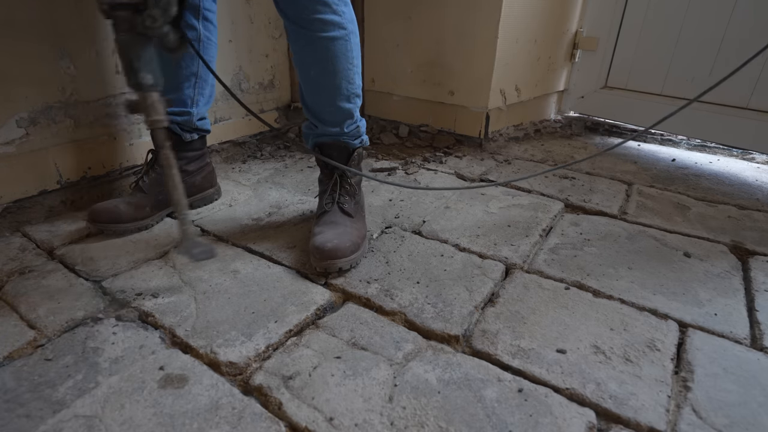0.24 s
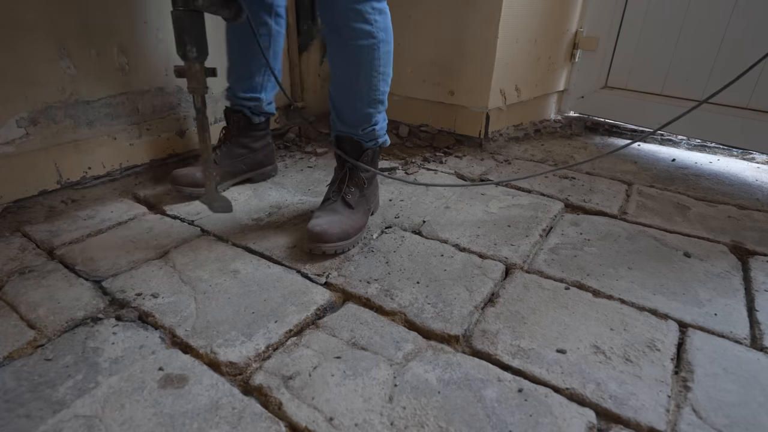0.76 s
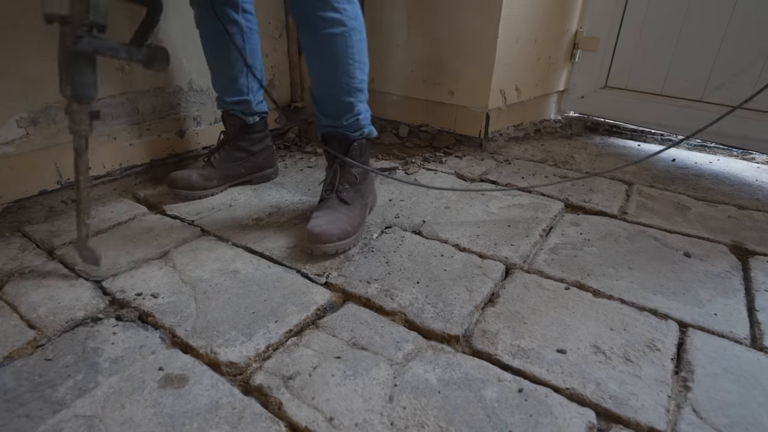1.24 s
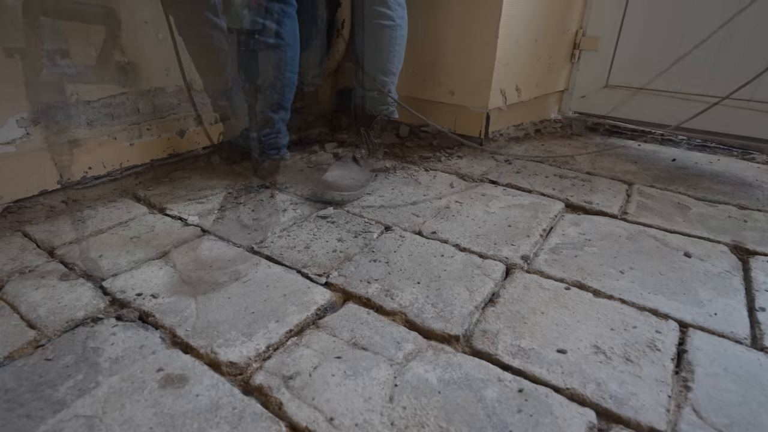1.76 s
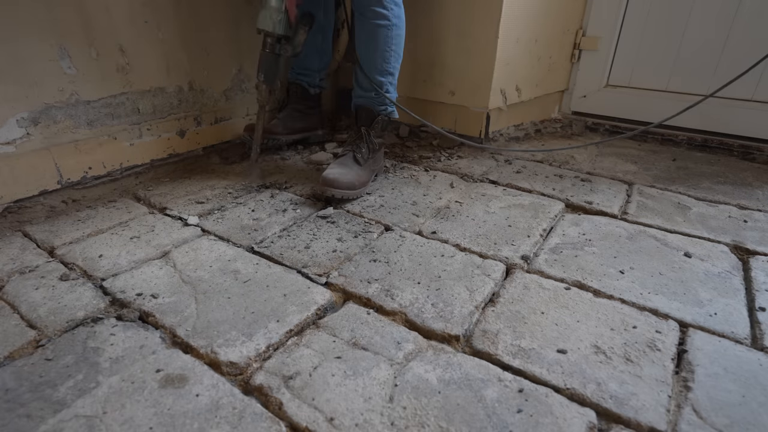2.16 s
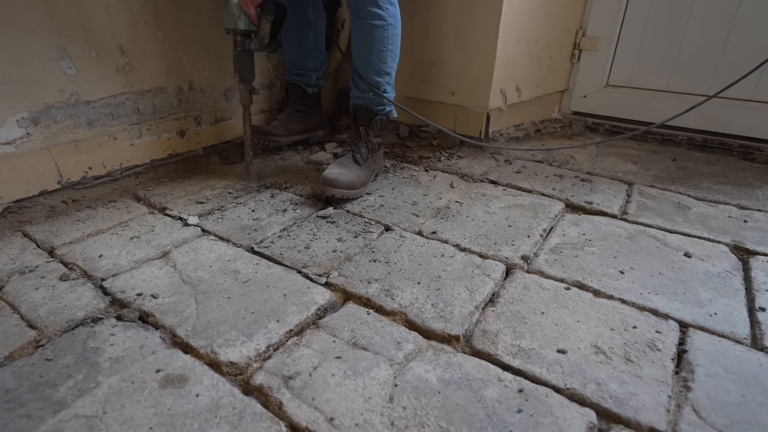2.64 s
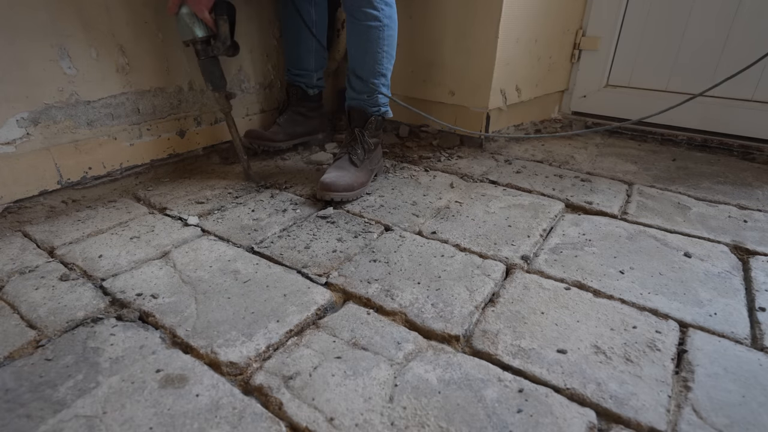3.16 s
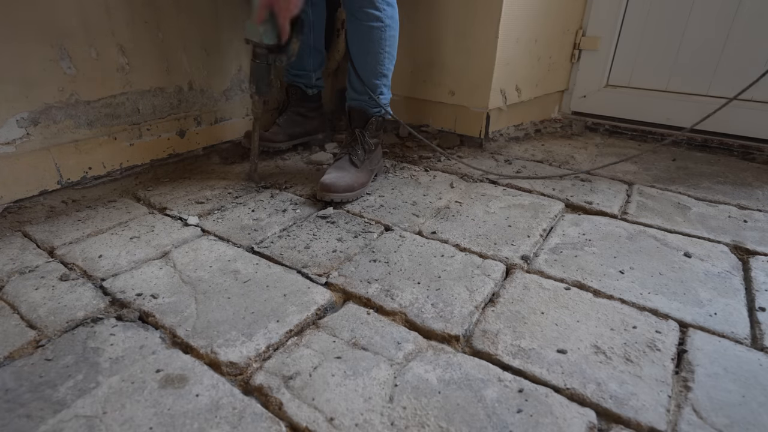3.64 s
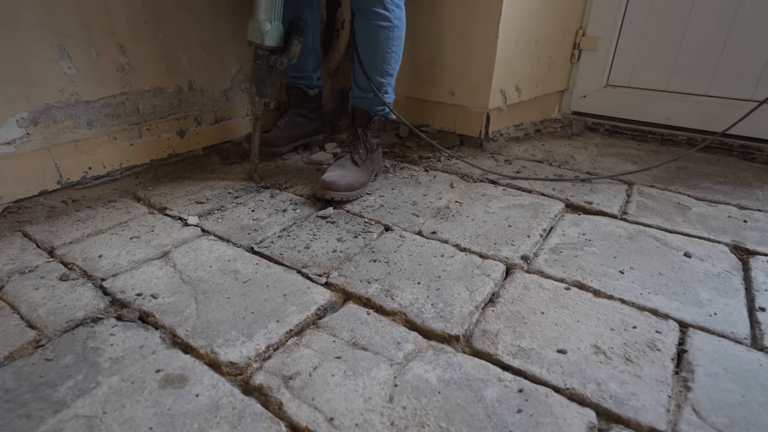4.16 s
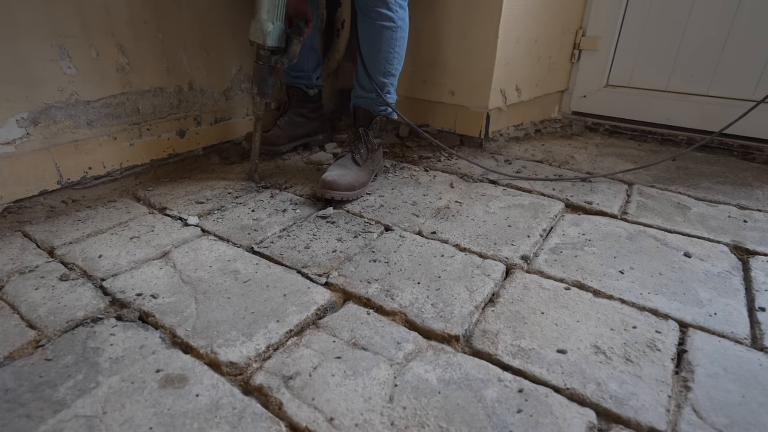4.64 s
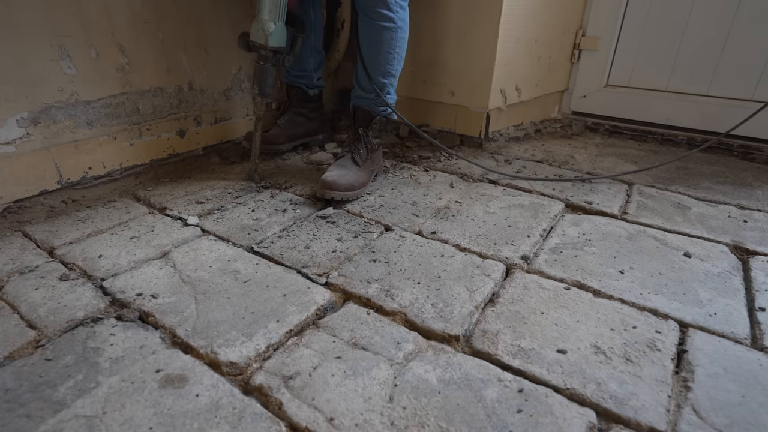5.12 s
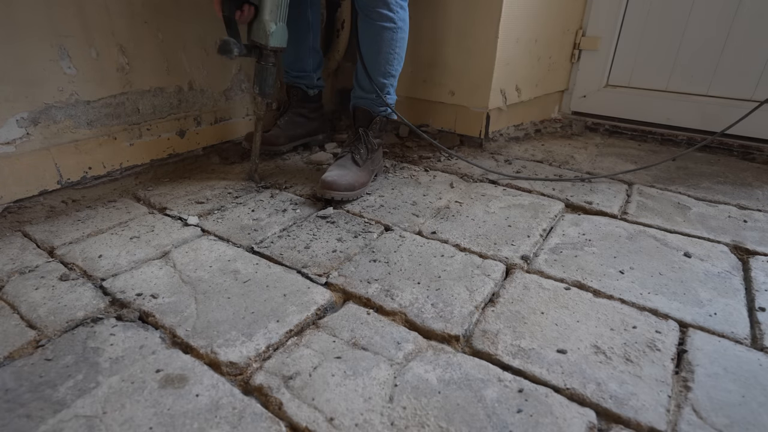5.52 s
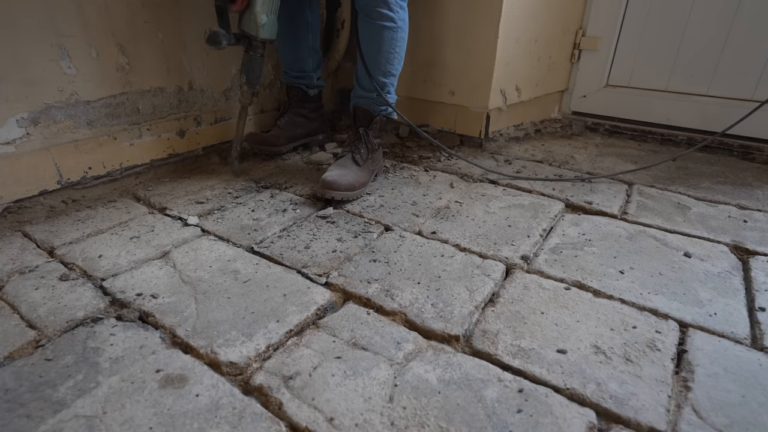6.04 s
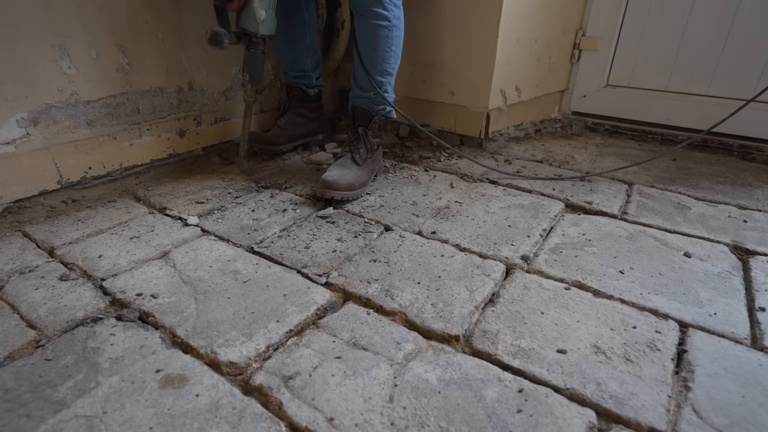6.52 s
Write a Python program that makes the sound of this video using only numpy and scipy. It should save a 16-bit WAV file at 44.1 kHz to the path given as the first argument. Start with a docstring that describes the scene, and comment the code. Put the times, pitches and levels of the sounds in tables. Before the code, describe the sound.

Close, hard chisel blows rattle on stone with bright steel ringing, between motor whoosh, dull knocks and gritty scrapes in an echoing hallway.

```python
"""In a bare hallway, an electric demolition hammer heard close by chisels stone paving and mortar.
Each blow cracks on the stone (noise bursts) and rings the steel bit (decaying sines). The blows
speed up, hold and slow down, and a second spell spins up at the end. In the pauses the bit scrapes,
squeaks and knocks among loose slabs. Behind it motor air rushes, the floor booms and walls echo.
Table levels are relative: each function sets them with its own trims."""
import sys
import numpy as np
from scipy import signal
from scipy.fft import rfft, irfft, next_fast_len
from scipy.io import wavfile
from scipy.ndimage import uniform_filter1d

SR = 44100
rng = np.random.default_rng(int(sys.argv[2]) if len(sys.argv) > 2 else 0)


def int16_out(signal):
    """Quantize to a 16-bit WAV file."""
    q = np.round(np.clip(np.atleast_2d(signal).T, -1, 1) * 32767)
    wavfile.write(sys.argv[1], SR, q.astype(np.int16))


N = 299439
CUTOFF_HZ = 15750   # nothing is heard far above this


# Motor speed: let go, it coasts down against air drag and friction until the piston stalls.
FULL_BLOWS_PER_S, STALL_BLOWS_PER_S = 23.1605, 2.5
COAST_S, FRICTION_PER_S2 = .692, .814
# Spells of hammering. Each row: first blow in seconds, blows per second at that moment,
# spin-up time in seconds, moment the trigger is let go in seconds.
HAMMER_SPELLS = [(2.0024, 12.875, .17976, 3.4133), (6.5425, 6.66, .129, 7.0)]


def blow_times():
    """One blow per turn of the crank, which spins up under the trigger and then coasts down."""
    times, t = [], np.arange(3 * SR) / SR
    friction = FRICTION_PER_S2 * COAST_S
    for first, start_rate, spin_up_s, let_go in HAMMER_SPELLS:
        driven = FULL_BLOWS_PER_S + (start_rate - FULL_BLOWS_PER_S) * np.exp(-t / spin_up_s)
        coasting = np.exp(-np.maximum(first + t - let_go, 0) / COAST_S)
        rate = (driven + friction) * coasting - friction
        turns = np.cumsum(rate[rate > STALL_BLOWS_PER_S]) / SR
        times += list(first + np.searchsorted(turns, np.arange(turns[-1])) / SR)
    return np.array([s for s in times if s < N / SR])


CRACK_SCATTER_DB = 2.5   # from blow to blow
# How the tip bears on the stone while hammering. Each row: time in seconds, crack in dB, ring in dB,
# ring tilt in dB per main mode, side modes in dB, floor boom in dB.
TIP_CONTACT = [(2.0, -28, -30.5, 8, -50, -46), (2.07, -31, -29.5, 8, -32.5, -48),
               (2.19, -24.5, -29, -3, -28.5, -44.5), (2.33, -30, -32.5, 1, -34.5, -46.5),
               (2.48, -29.5, -32.5, 2, -49, -48), (2.62, -30, -31, 1, -38, -51),
               (2.77, -26.5, -30, -2.5, -64, -43), (2.92, -28.5, -28.5, -3.5, -41, -53),
               (3.03, -28, -28.5, 3, -41, -51), (3.2, -29.5, -29, 5, -50, -48),
               (3.33, -27, -29.5, 2.5, -44, -46), (3.38, -33.5, -31, 4.5, -42, -54),
               (3.47, -31, -27, 1.5, -67, -46), (3.565, -29, -30, 3, -48, -44),
               (3.63, -27, -32, -5, -30.5, -40), (3.755, -27, -29, 5, -38.5, -44),
               (3.83, -22.5, -26.5, 4, -34, -37.5), (3.92, -30, -40, 11, -31, -36.5),
               (4.01, -18.5, -31.5, 5, -40, -37.5), (4.14, -22, -35.5, 2, -54, -40),
               (4.45, -17, -42, 1, -52, -45), (4.71, -18.5, -43, -8, -50, -44),
               (6.54, -23.5, -32, -1, -33.5, -39), (6.63, -31, -25, 15, -35, -48),
               (6.69, -25, -32.5, 5, -30.5, -45), (6.745, -24, -33.5, 7, -36, -52)]


def hammer_blows():
    """Each blow takes its strength and colour from the contact then: rows with the contact's columns."""
    times, (s, *columns) = blow_times(), np.transpose(TIP_CONTACT)
    crack, *others = [np.interp(times, s, c) for c in columns]
    scattered = crack + CRACK_SCATTER_DB * rng.standard_normal(len(times))
    return np.column_stack([times, scattered, *others])


RING_SCATTER_DB, BLOW_RING_DB = 5, -2   # from blow to blow; trim of the ring under the piston
# Free ringing when the side modes are as strong as the crack; the weaker they are, the shorter.
BLOW_FREE_S, LOOSENING = 0.025, 0.54


def share_ring(strikes):
    """Deal each blow's ring among the main modes: (s, crack dB, dB of each mode, side modes dB, free s)."""
    rows, driven_db = [], np.array(BIT_MAIN_MODES)[:, 1]
    for s, crack_db, ring_db, tilt_db, sides_db in strikes:
        scatter_db = RING_SCATTER_DB * rng.standard_normal(len(BIT_MAIN_MODES))
        shares = rms_one(from_db(driven_db + tilt_db * np.array([-1, 0, 1, 1]) + scatter_db))
        mains_db = ring_db + BLOW_RING_DB + 20 * np.log10(shares)
        free_s = BLOW_FREE_S * from_db(LOOSENING * (sides_db - crack_db))
        rows.append((s, crack_db, *mains_db, sides_db, free_s))
    return rows


# Each strike rings another spot of the stone: centre and scatter of its pitch, width, share.
SLAB_HZ, SLAB_OCTAVES, SLAB_WIDTH_HZ, SLAB_DB = 1900, .8, 240, -12.5
# Colour of the cracking stone. Each row: frequency in Hz, level in dB per Hz.
STONE_COLOUR = [(30, -25), (200, -1.5), (500, 2), (1300, -1), (2800, 1.5), (4000, 6.5), (5000, 3),
                (6200, 4.5), (8000, 5.5), (11400, 0.5), (15600, -4.5)]
# Colour of the piston clashing on the steel shank. Each row: frequency in Hz, level in dB per Hz.
CLASH_COLOUR = [(2000, -23.5), (5200, -8.5), (6150, 1), (6800, -0.5), (7400, 8), (8000, -1), (9500, 0),
                (11400, -7), (12350, 9), (13000, -3), (14400, -7), (15600, -3.5)]


def cracks(strikes, crack_db=8.0, crack_t60=0.056, snap_db=12.0, snap_t60=0.0021,
           strike_db=4.0, strike_t60=0.0059, clash_db=13.5, clash_t60=0.04,
           firm_db=-21.0, shortening=0.26):
    """Steel is struck, the tip snaps on the stone, the slab answers; very hard blows crack shorter."""
    out, size = np.zeros(N), SR // 8
    for s, level_db, *rings, _ in strikes:
        t60 = crack_t60 * from_db(-shortening * max(level_db - firm_db, 0))
        snap = from_db(snap_db) * burst(STONE_COLOUR, snap_t60, size)
        stone = burst(STONE_COLOUR, t60, size) + snap
        slab_hz = np.clip(SLAB_HZ * 2 ** (SLAB_OCTAVES * rng.standard_normal()), SR / 100, SR / 8)
        slab = rms_one(resonate(stone, slab_hz, SLAB_WIDTH_HZ))
        stone = stone + from_db(SLAB_DB) * stone.std() * slab
        strike = from_db(strike_db) * burst(CLASH_COLOUR, strike_t60, size)
        # the ringing shank buzzes in its holder
        rattle_gain = np.linalg.norm(from_db(rings)) * from_db(clash_db)
        rattle = rattle_gain * burst(CLASH_COLOUR, clash_t60, size)
        add(out, s, from_db(level_db + crack_db) * (stone + strike) + rattle)
    return out


# Pressed back on the stone the ring drops by this much; pitch scatter (share) and phase chatter.
SEATED_DB, DETUNE, CHATTER_TURNS = -26, .0022, .11
# The bit's low, middle, upper and top main modes. Each row: frequency in Hz, level in dB under the
# piston, t60 in seconds before the ring is lengthened by ring_scale.
BIT_MAIN_MODES = [(7342, -1, .04), (12245, -1, .036), (13520, -13, .045), (14375, -.5, .048)]
# Its side modes, strong while the tip sits loose. Each row: frequency in Hz, level in dB under the
# piston, level in dB when tapped, t60 in seconds before ring_scale.
BIT_SIDE_MODES = [(3975, -4, -13, .045), (5770, -10, -5, .04), (6110, -2, -14, .016), (7440, -4, 4, .045),
                  (8270, -9, -1, .045), (9062, -2, -6, .045), (10420, -9, 1, .05), (10780, -5, -12, .045)]
# The bit set down or bumped on the stone. Each row: start in seconds, crack in dB, low, middle, upper
# and top main mode in dB, side modes in dB, typical time it rings free in seconds.
BIT_TAPS = [(1.281, -44, -60, -50, -60, -55, -64, 0.015), (1.333, -39, -64, -58, -60, -58, -68, .012),
            (1.371, -30.5, -55, -56, -58, -56, -49, .008), (1.3921, -23.5, -34, -35, -36, -41, -32, 0.014),
            (1.516, -32.5, -35, -60, -53, -49, -63, 0.021), (1.542, -29.5, -38, -44, -54, -53, -49, .012),
            (1.575, -30, -59, -60, -60, -60, -62, .008), (1.718, -35, -59, -66, -62, -63, -67, .01),
            (1.7544, -27, -35, -51, -52, -55, -38, 0.0081), (1.773, -32.5, -49, -54, -56, -56, -50, .0074),
            (5.9091, -24.5, -34, -35, -34, -56, -33, 0.023), (6.014, -16.5, -55, -53, -48, -37, -50, .006),
            (6.2582, -26, -58, -61, -58, -52, -54, .008)]


def bit(strikes, side_modes_db, spread_db, free_spread, main_db=16.0, side_db=13.5,
        ring_scale=2.7, chatter_db=2.0, chatter_per_s=400):
    """The bit bounces free and rings, chattering, until the stone damps each mode at its own moment."""
    out, t = np.zeros(N), np.arange(SR // 6) / SR
    for s, _, *mains, sides, free_s in strikes:
        scatter_db = spread_db * rng.standard_normal(len(BIT_SIDE_MODES))
        levels = np.r_[np.add(mains, main_db), sides + side_db + side_modes_db + scatter_db]
        for (hz, *_, t60), level_db in zip(BIT_MAIN_MODES + BIT_SIDE_MODES, levels):
            landing_s = free_s * np.exp(free_spread * rng.standard_normal())
            landed = 1 - np.exp(-np.maximum(t / landing_s - 1, 0) * 2)
            chatter_turns = CHATTER_TURNS * drift(chatter_per_s, len(t))
            turns = hz * (1 + DETUNE * rng.standard_normal()) * t + rng.random() + chatter_turns
            level_chatter_db = chatter_db * drift(chatter_per_s, len(t))
            height = from_db(level_db + SEATED_DB * landed + level_chatter_db)
            add(out, s, height * fade(t, t60 * ring_scale) * np.sin(2 * np.pi * turns))
    return out


# Chips snapping off. Each row: start in seconds, level in dB.
STONE_CHIPS = [(1.303, -29), (4.778, -22.5), (5.168, -30), (5.433, -24), (5.498, -32), (6.468, -24.5)]


def chips(chip_db=0.0, t60=0.021):
    """Flakes snap off the stone, each with a tiny crack."""
    out = np.zeros(N)
    for s, level_db in STONE_CHIPS:
        add(out, s, from_db(level_db + chip_db) * burst(STONE_COLOUR, t60, SR // 8))
    return out


# The slab gives way under a blow or a boot. Each row: start in seconds, level in dB, pitch in Hz,
# t60 in seconds.
SLAB_THUMPS = [(0.76, -27.5, 198, 0.04), (1.773, -34, 100, 0.08), (2.859, -7, 110, 0.0062),
               (2.989, -23.5, 110, 0.018), (3.119, -18, 110, 0.013), (3.161, -10.5, 110, 0.0048),
               (3.291, -21.5, 109, 0.026), (3.421, -20.5, 110, 0.012)]


def thumps(thump_db=5.0):
    """A slab drops into its bed: a low tone that dies within a few swings."""
    out, t = np.zeros(N), np.arange(SR // 10) / SR
    for s, level_db, hz, t60 in SLAB_THUMPS:
        add(out, s, from_db(level_db + thump_db) * fade(t, t60) * np.sin(2 * np.pi * hz * t))
    return out


# Lumps of mortar under the tip. Each row: start in seconds, level in dB, resonance in Hz.
MORTAR_CRUNCHES = [(0.366, -36, 1800), (0.397, -30, 1590), (0.407, -31, 1700), (0.412, -26, 523),
                   (0.417, -26, 1480), (0.424, -37, 3300), (0.43, -29, 1540), (0.436, -31, 1380),
                   (0.586, -43, 1380), (0.643, -47, 1450), (0.705, -36, 1640), (0.768, -27.5, 1280),
                   (1.303, -33.5, 1850), (1.331, -35, 1740), (1.888, -31, 734), (5.108, -43.5, 915),
                   (5.667, -40, 685), (5.685, -41.5, 1530), (5.497, -45, 2060), (6.089, -32, 4200),
                   (6.098, -27, 3180)]


def crunches(crunch_db=6.0, t60=0.038, width_share=0.43, rough_db=2.5):
    """A lump breaks in a quick run of slips, which ring a broad resonance of the slab."""
    out, size = np.zeros(N), SR // 8
    decay = fade(np.arange(size) / SR, t60)
    for s, level_db, hz in MORTAR_CRUNCHES:
        slips = rng.standard_normal(size) * from_db(rough_db * drift(460, size))
        width_hz = width_share * hz
        body = rms_one(resonate(resonate(slips, hz, width_hz), hz, 2 * width_hz))
        add(out, s, from_db(level_db + crunch_db) * decay * body)
    return out


# Dull knocks of slabs, boots and tool. Each row: start in seconds, thud in dB, clack in dB.
DULL_KNOCKS = [(0.759, -34, -39), (1.37, -29.5, -29), (1.642, -39, -40), (1.774, -27, -33),
               (1.891, -32, -32.5), (5.106, -55, -40), (5.667, -46, -42.5), (5.685, -47, -44),
               (5.729, -42, -45), (5.818, -50, -45.5), (5.996, -19.5, -25), (6.09, -34, -29),
               (6.116, -32, -45), (6.17, -40, -31), (6.2, -34, -37), (6.261, -36, -31), (6.277, -34, -38)]
# Colour of the thud. Each row: frequency in Hz, level in dB per Hz.
THUD_COLOUR = [(25, -10), (90, 9), (200, 4), (400, 4.5), (800, -12.5), (2000, -68), (16000, -83)]
# Colour of the clack. Each row: frequency in Hz, level in dB per Hz.
CLACK_COLOUR = [(100, -39), (500, 2), (1200, -3), (2500, -7), (5000, -7), (10000, -16), (16000, -19)]


def knocks(thud_db=0.0, thud_t60=0.085, clack_db=5.0, clack_t60=0.052):
    """Heavy things bump: a low thud with a stony clack on top."""
    out, size = np.zeros(N), SR // 5
    for s, low_db, high_db in DULL_KNOCKS:
        thud = from_db(low_db + thud_db) * burst(THUD_COLOUR, thud_t60, size)
        clack = from_db(high_db + clack_db) * burst(CLACK_COLOUR, clack_t60, size)
        add(out, s, thud + clack)
    return out


# The bit dragged through grit. Each row: start and end in seconds, level at start and end in dB,
# resonance in Hz, its width in Hz, its share in dB.
GRIT_SCRAPES = [(0.342, 0.443, -35, -26.5, 1480, 990, -6), (0.76, 0.831, -38, -38.5, 195, 120, 3),
                (1.295, 1.353, -47, -34, 1730, 980, -5), (1.886, 2.005, -31.5, -27.5, 760, 200, -1),
                (4.719, 4.822, -37, -39.5, 640, 400, -7), (5.321, 5.4, -47.5, -49, 1000, 500, -11),
                (5.402, 5.521, -53, -44.5, 1200, 200, 0.5), (5.763, 5.812, -45, -47.5, 1130, 900, -10),
                (5.91, 5.929, -19, -23, 3260, 900, -5), (6.01, 6.416, -27.5, -60.5, 245, 110, 1.5),
                (6.473, 6.544, -41.5, -29, 684, 202, 1), (6.485, 6.54, -37, -29.5, 4940, 900, -1),
                (6.579, 6.635, -29.5, -24.5, 716, 247, -15)]
# Colour of the grit. Each row: frequency in Hz, level in dB per Hz.
GRIT_COLOUR = [(100, -9), (400, -4), (1600, -8), (3000, -4), (5000, -5.5), (8000, -9.5), (12000, -12),
               (16000, -18)]


def scrapes(grains_per_s=3500, size_db=-1.0, catch_db=1.0, overtone_db=-9.5):
    """Crushed grains click in clumps as the tip catches, exciting a resonance and its octave."""
    out = np.zeros(N)
    for start, end, start_db, end_db, hz, width_hz, share_db in GRIT_SCRAPES:
        size = max(round((end - start) * SR), SR // 100)
        clicks = (rng.random(size) < grains_per_s / SR) * rng.choice([-1, 1], size)
        grains = clicks * from_db(size_db * np.minimum(rng.exponential(1, size), 4))
        grains = grains * from_db(catch_db * drift(190.5, size))
        groan = rms_one(resonate(resonate(grains, hz, width_hz), hz, 2 * width_hz))
        octave = rms_one(resonate(grains, 2 * hz, 2 * width_hz))
        groan = groan + from_db(overtone_db) * octave
        sound = rms_one(coloured(grains, GRIT_COLOUR) + from_db(share_db) * groan)
        level = from_db(np.linspace(start_db, end_db, size))
        add(out, start, sound * level * signal.windows.tukey(size, .1))
    return out


# Steel squeaking on stone. Each row: start in seconds, length in seconds, base and turning pitch of the
# arched glide in Hz, level in dB, slope in dB per overtone, pitch jitter as a share.
STEEL_SQUEAKS = [(4.803, 0.0108, 1490, 1850, -32, -6.5, 0.068),
                 (5.126, 0.022, 2120, 2510, -36.5, -4, 0.017), (5.147, 0.022, 2050, 1770, -52, -18, .03),
                 (5.351, 0.017, 1130, 1290, -54, -11, .03), (5.367, 0.0084, 1330, 1245, -28, 0.6, 0.054),
                 (5.398, 0.0165, 1414, 1272, -23, 0, 0.04)]


def squeaks(slips_per_s=1800, rough_db=0.0, arch=2.35, body_hz=2600, body_width_hz=500,
            body_db=4.5, count=12):
    """Stick and slip: an arched glide with uneven slips; a tool resonance lifts overtones near it."""
    out, orders = np.zeros(N), np.arange(1, count + 1)[:, None]
    for s, length, start_hz, end_hz, level_db, slope_db, jitter in STEEL_SQUEAKS:
        size = round(length * SR)
        glide_hz = start_hz + (end_hz - start_hz) * np.sin(np.linspace(0, arch, size))
        hz = glide_hz * (1 + jitter * drift(slips_per_s, size))
        lift_db = body_db / (1 + ((orders * end_hz - body_hz) / body_width_hz) ** 2)
        weights = from_db(slope_db * orders + lift_db) * (orders * end_hz < CUTOFF_HZ)
        turns = orders * np.cumsum(hz) / SR + rng.random((count, 1))
        tone = np.sum(weights * np.sin(2 * np.pi * turns), axis=0)
        tone = tone * from_db(rough_db * drift(slips_per_s, size))
        add(out, s, from_db(level_db) * rms_one(tone * np.sqrt(np.hanning(size))))
    return out


# The housing's narrow howl, at its highest here, sinks as the air slows.
HOWL_HZ, HOWL_WIDTH_HZ, HOWL_HZ_PER_DB = 712, 100, 4
# Motor and cooling air. Each row: time in seconds, rush in dB, housing drone in dB, rumble in dB.
MOTOR_LEVELS = [(0.0, -34.5, -44.5, -59), (0.68, -33.5, -43.5, -55), (1.17, -37.5, -47.5, -61.5),
                (1.59, -39, -52, -51), (2.12, -39, -53, -53.5), (3.56, -37.5, -54, -49.5),
                (3.86, -33, -48, -47.5), (4.22, -35, -42.5, -49.5), (4.73, -42.5, -49, -50.5),
                (5.05, -58.5, -57.5, -65.5), (5.27, -56, -77, -79), (5.38, -53, -66, -67.5),
                (6.5, -58, -65, -62), (6.79, -54, -50, -49)]
# Colour of the rush. Each row: frequency in Hz, level in dB per Hz.
RUSH_COLOUR = [(530, -27), (900, -5.5), (1830, -6), (2030, -9), (2580, -4.5), (4940, -4), (6130, -4.5),
               (10500, -7), (15800, -17.5)]
# Colour of the drone. Each row: frequency in Hz, level in dB per Hz.
DRONE_COLOUR = [(250, -24.5), (430, -3), (540, -4.5), (700, 2), (800, -0.5), (950, -8.5), (1400, -8.5),
                (2500, -78)]
# Colour of the rumble. Each row: frequency in Hz, level in dB per Hz.
RUMBLE_COLOUR = [(20, -42), (70, -3), (160, -5.5), (235, 5.5), (330, 2.5), (440, 5.5), (650, -77),
                 (1500, -45)]
# Air path resonances that swell and fade as the tool is swung. Each row: centre in Hz, width in Hz,
# level in dB.
AIR_VENTS = [(1900, 250, -14.5), (4110, 120, -12), (4930, 280, -14), (6850, 470, -34), (7570, 600, -11.5),
             (10300, 520, -34)]
# Low resonances of the hallway. Each row: centre in Hz, width in Hz, level in dB.
HALL_RESONANCES = [(234.6, 11, -3), (285.1, 3, -6), (407, 15, -10)]


def motor(rush_db=-2.0, drone_db=2.0, rumble_db=0.0, flutter_db=1.5, swing_db=4.0,
          howl_db=-2.5, treble_hz=7000, dulling=0.12):
    """Cooling air rushes through the housing, which drones, howls and rumbles; the gears flutter it."""
    rush, drone, rumble = in_time(MOTOR_LEVELS)
    slowing_db = rush - rush.max()
    hiss = noise(RUSH_COLOUR, N)
    for hz, width_hz, level_db in AIR_VENTS:
        vent = rms_one(resonate(rng.standard_normal(N), hz, width_hz))
        hiss = hiss + from_db(level_db + swing_db * drift(7.9, N)) * vent
    dull = signal.sosfiltfilt(signal.butter(2, treble_hz, fs=SR, output="sos"), hiss)
    hiss = dull + (hiss - dull) * from_db(dulling * slowing_db)   # slower air is duller
    howl = gliding_band(HOWL_HZ + HOWL_HZ_PER_DB * slowing_db, HOWL_WIDTH_HZ)
    air = from_db(rush + rush_db) * hiss
    air = air + from_db(drone + drone_db) * noise(DRONE_COLOUR, N)
    air = air + from_db(drone + howl_db) * howl
    lows = noise(RUMBLE_COLOUR, N)
    for hz, width_hz, level_db in HALL_RESONANCES:
        lows = lows + from_db(level_db) * rms_one(resonate(rng.standard_normal(N), hz, width_hz))
    return air * from_db(flutter_db * drift(120, N)) + from_db(rumble + rumble_db) * lows


# Bands of rushing air as the idling tool is carried over. Each row: start and end in seconds,
# start and end centre in Hz, level in dB.
AIR_SWELLS = [(0.0, 0.31, 4400, 3950, -43), (0.101, 0.7, 5010, 4740, -40), (0.4, 0.71, 8300, 7600, -44),
              (0.421, 1.21, 1350, 1596, -45), (0.48, 1.2, 3780, 3650, -46), (0.502, 1.3, 10750, 10240, -48),
              (0.7, 0.9, 5180, 5350, -42), (0.97, 1.3, 4580, 4300, -48)]


def swells(swell_db=0.0, width_hz=480):
    """As the vents turn, one band of the rush after another comes forward, glides and sinks back."""
    out = np.zeros(N)
    for start, end, start_hz, end_hz, level_db in AIR_SWELLS:
        size = round((end - start) * SR)
        band = gliding_band(np.linspace(start_hz, end_hz, size), width_hz)
        add(out, start, from_db(level_db + swell_db) * band * np.sin(np.linspace(0, np.pi, size)))
    return out


BOOM_HZ, BOOM_WIDTH_HZ = 93.6, 17.8
# Boots and shifting slabs shake the floor. Each row: start in seconds, level in dB, swell in seconds.
FLOOR_BOOMS = [(0.76, -49.5, 0.033), (1.35, -38, 0.058), (1.585, -32, 0.026), (1.715, -29, 0.028),
               (1.785, -25.5, 0.027), (5.1, -56, 0.17), (5.66, -52.5, 0.087), (6.035, -25, 0.021),
               (6.095, -40, 0.025), (6.283, -34.5, 0.025), (6.59, -35, 0.025)]


def boom(blows, boom_db=2.5, evenness=0.48, blow_swell_s=0.033, rest_db=-64.5):
    """Steps and blows feed one low resonance of the hallway, which swells and dies after each."""
    tone = resonate(rng.standard_normal(N + SR), BOOM_HZ, BOOM_WIDTH_HZ)
    tone = resonate(tone, BOOM_HZ, 2 * BOOM_WIDTH_HZ)[SR:]
    beating = np.sqrt(uniform_filter1d(tone ** 2, SR // 45) + 1e-18)
    power, t = np.full(N, from_db(rest_db) ** 2), np.arange(SR) / SR
    for s, level_db, swell_s in FLOOR_BOOMS + [(s, db, blow_swell_s) for s, *_, db in blows]:
        swell = (t / swell_s * np.exp(1 - t / swell_s)) ** 2
        add(power, s, (from_db(level_db) * swell) ** 2)
    return from_db(boom_db) * np.sqrt(power) * rms_one(tone / beating ** evenness)


# How long the echoes and the bit's lingering treble ring last. Each row: frequency in Hz,
# t60 in seconds.
LINGER_T60 = [(100, 0.7), (700, 0.65), (3000, 0.62), (8000, 0.26), (15000, 0.82)]


def hallway(x, build_s=0.001):
    """Diffuse echoes build up between the walls and, with the bit's treble ring, die band by band."""
    t, edges = np.arange(SR) / SR, np.geomspace(50, 18000, 10)
    tail = 0
    for low, high in zip(edges, edges[1:]):
        band_filter = signal.butter(2, [low, high], "band", fs=SR, output="sos")
        band = signal.sosfilt(band_filter, rng.standard_normal(SR))
        tail = tail + band * fade(t, at_hz(LINGER_T60, np.sqrt(low * high)))
    tail = tail * (1 - np.exp(-t / build_s))
    return signal.fftconvolve(x, tail / np.sqrt(np.sum(tail ** 2)))[:N]


def lingering_ring(main_db=-38.0, side_db=-37.0, width_hz=320, t60=0.42):
    """At the start the hallway still rings with the bit's last blows: fading bands at its modes."""
    modes = [(hz, main_db + db) for hz, db, _ in BIT_MAIN_MODES]
    modes += [(hz, side_db + db) for hz, db, *_ in BIT_SIDE_MODES]
    out, decay = np.zeros(N), fade(np.arange(SR) / SR, t60)
    for hz, level_db in modes:
        band = resonate(resonate(rng.standard_normal(SR), hz, width_hz), hz, 2 * width_hz)
        add(out, 0, from_db(level_db) * decay * rms_one(band))
    return out


HUSH_DB = -64
# Colour of the building's low background. Each row: frequency in Hz, level in dB per Hz.
HUSH_COLOUR = [(25, -15), (55, 7), (110, 1), (220, -12), (400, -36), (2000, -50)]


def hush():
    """The building's low background: steady coloured noise."""
    return from_db(HUSH_DB) * noise(HUSH_COLOUR, N)


def from_db(db):
    """Decibels to gain."""
    return 10 ** (np.asarray(db) / 20)


def rms_one(x):
    """Scale to rms 1."""
    return x / np.sqrt(np.mean(x ** 2) + 1e-20)


def in_time(rows):
    """Each column of a curve at every sample."""
    s, *columns = np.transpose(rows)
    return [np.interp(np.arange(N) / SR, s, c) for c in columns]


def at_hz(points, hz):
    """Read a table on a log-frequency axis."""
    table_hz, values = np.array(points).T
    return np.interp(np.log(np.maximum(hz, 1)), np.log(table_hz), values)


def noise(spectrum, size):
    """Noise of the given colour, rms 1."""
    return coloured(rng.standard_normal(size), spectrum)


def coloured(x, spectrum):
    """Give a signal a colour, rms 1."""
    size = next_fast_len(len(x))
    gain = from_db(at_hz(spectrum, np.fft.rfftfreq(size, 1 / SR)))
    return rms_one(irfft(rfft(x, size) * gain, size)[:len(x)])


def drift(rate, size):
    """A random curve through `rate` new points per second, spread about 1."""
    return np.interp(np.arange(size) / SR * rate, np.arange(4000), rng.standard_normal(4000))


def resonate(x, hz, width_hz):
    """One resonance, gain about 1 on top."""
    r = np.exp(-np.pi * width_hz / SR)
    feedback = [1, -2 * r * np.cos(2 * np.pi * hz / SR), r * r]
    return signal.lfilter(np.array([1, 0, -1]) * (1 - r * r) / 2, feedback, x)


def gliding_band(hz, width_hz):
    """A narrow band of noise whose centre follows the curve hz, rms 1."""
    phase = 2 * np.pi * np.cumsum(hz) / SR
    low_pass = signal.butter(2, width_hz / 2, fs=SR, output="sos")
    a, b = signal.sosfilt(low_pass, rng.standard_normal((2, len(hz))))
    return rms_one(a * np.cos(phase) + b * np.sin(phase))


def fade(t, t60):
    """Exponential decay, 60 dB in t60 seconds."""
    return np.exp(-np.log(1000) * t / t60)


def burst(spectrum, t60, size, rise_s=0.00081):
    """A noisy hit that rises almost at once and dies away."""
    t = np.arange(size) / SR
    return (1 - np.exp(-t / rise_s)) * fade(t, t60) * noise(spectrum, size)


def add(out, s, sound):
    """Mix a sound in at time s."""
    i = max(round(s * SR), 0)
    out[i:i + len(sound)] += sound[:max(N - i, 0)]


def scene(ring_wet_db=-9.5, stone_wet_db=-10.0, squeak_wet_db=-8.5):
    """Tool and stone, heard directly and from the walls, over motor, floor boom and hush."""
    blows = hammer_blows()
    driven = share_ring(blows[:, :-1])
    _, driven_db, tapped_db, _ = np.transpose(BIT_SIDE_MODES)
    steel = bit(driven, driven_db, spread_db=4.0, free_spread=0.34)
    steel = steel + bit(BIT_TAPS, tapped_db, spread_db=2.0, free_spread=0.1)
    stone = cracks(driven) + cracks(BIT_TAPS, clash_db=-1.0) + chips()
    stone = stone + knocks() + scrapes() + crunches()
    squeal = squeaks()
    to_walls = from_db(ring_wet_db) * steel + from_db(stone_wet_db) * stone
    to_walls = to_walls + from_db(squeak_wet_db) * squeal
    echoes = hallway(to_walls) + lingering_ring()
    background = motor() + swells() + boom(blows) + hush()
    return (steel + stone + squeal + thumps() + echoes + background)[None]


def record(dry, threshold_db=-24.0, squeeze=0.81, release_db_per_s=350, attack_s=0.0074,
           top=0.38, low_cut_hz=36):
    """At the microphone, gain control ducks loud sounds after their onset; peaks round, extremes are cut."""
    power = uniform_filter1d(dry[0] ** 2, SR // 500)
    level_db = 10 * np.log10(np.maximum(power, 1e-12))
    # the excess jumps up with the level and falls back at the release rate
    fall = release_db_per_s * np.arange(N) / SR
    over_db = np.maximum.accumulate(np.maximum(level_db - threshold_db, 0) + fall) - fall
    r = np.exp(-1 / (attack_s * SR))
    ducked = dry * from_db(-squeeze * signal.lfilter([1 - r], [1, -r], over_db))
    ducked = signal.sosfilt(signal.butter(2, low_cut_hz, "high", fs=SR, output="sos"), ducked)
    rounded = top * np.tanh(ducked / top)
    return signal.sosfilt(signal.ellip(10, .2, 80, CUTOFF_HZ, fs=SR, output="sos"), rounded)


dry = scene()
out = record(dry)
int16_out(out)
```